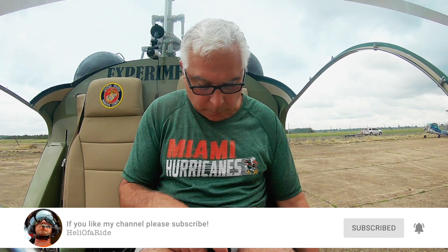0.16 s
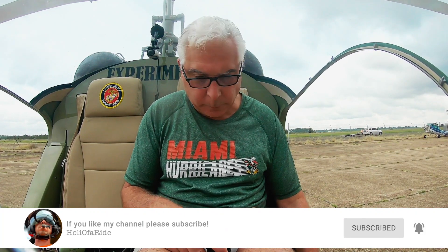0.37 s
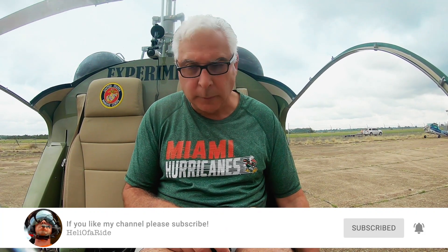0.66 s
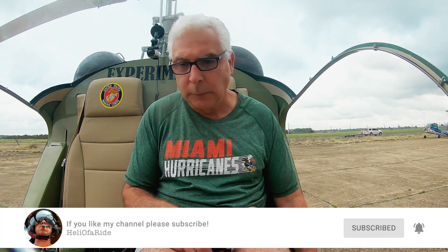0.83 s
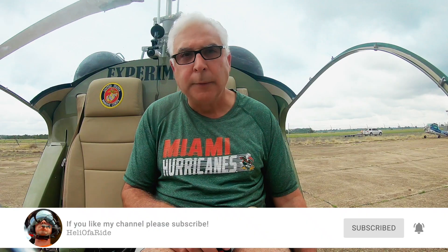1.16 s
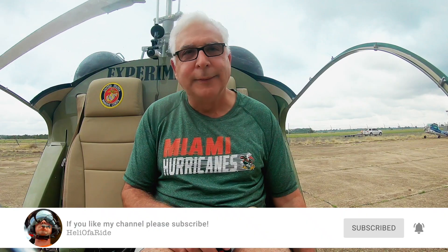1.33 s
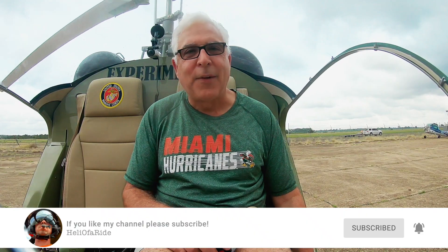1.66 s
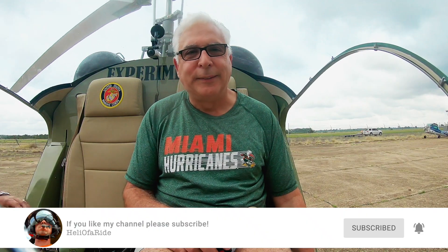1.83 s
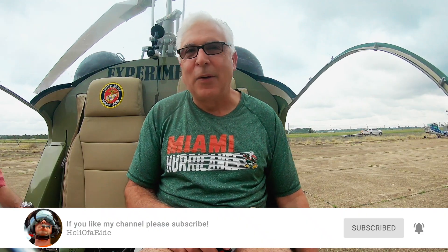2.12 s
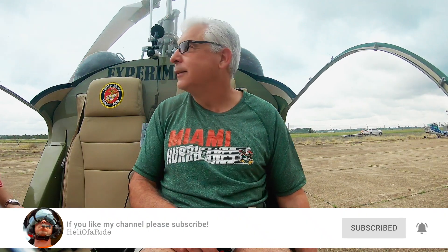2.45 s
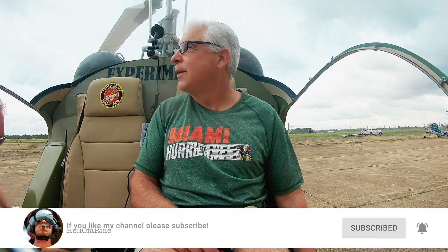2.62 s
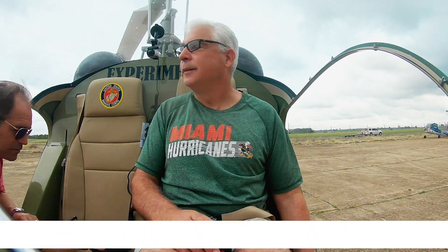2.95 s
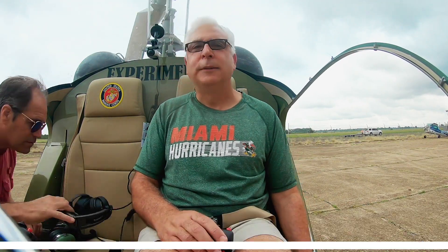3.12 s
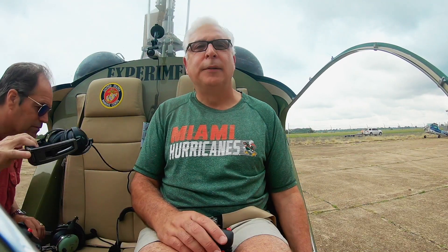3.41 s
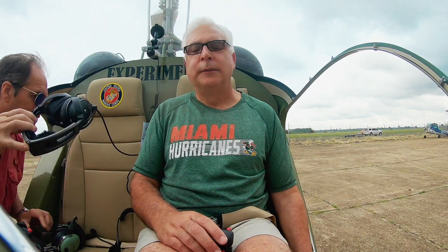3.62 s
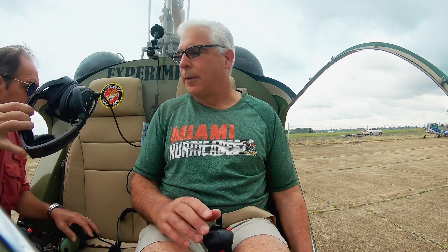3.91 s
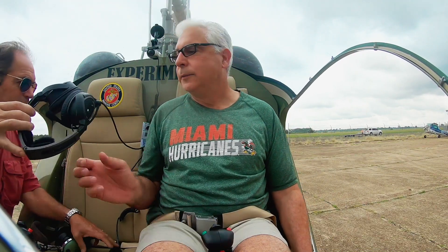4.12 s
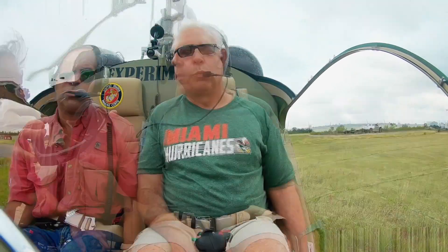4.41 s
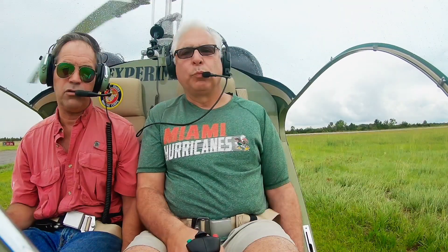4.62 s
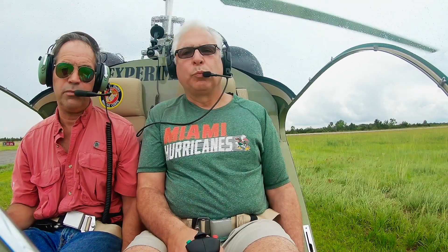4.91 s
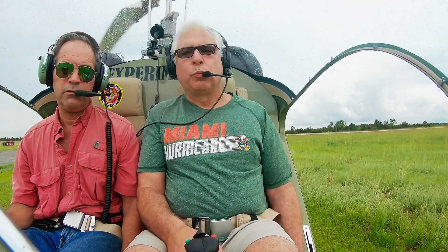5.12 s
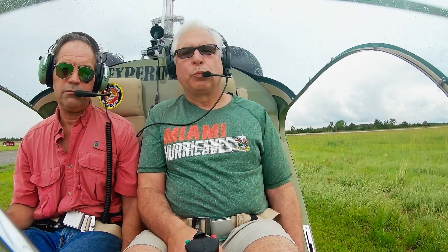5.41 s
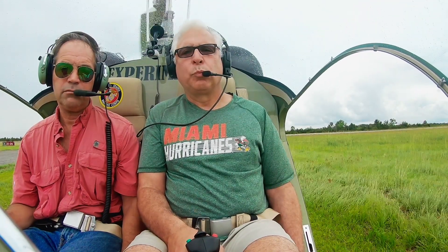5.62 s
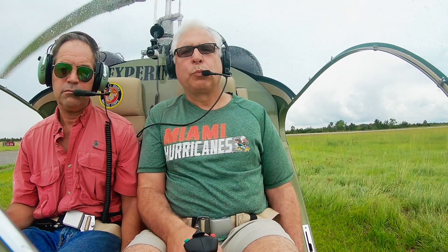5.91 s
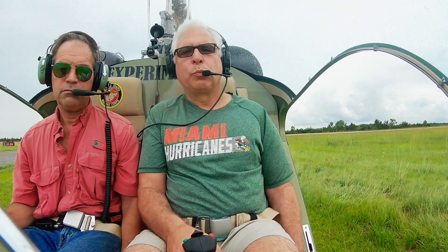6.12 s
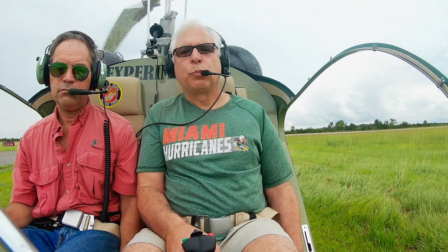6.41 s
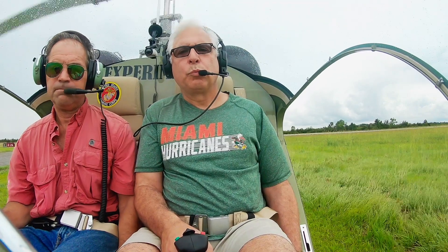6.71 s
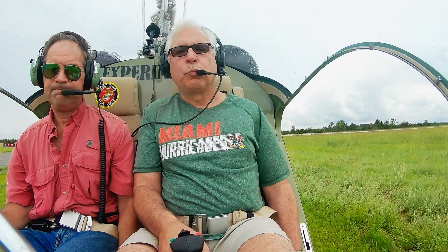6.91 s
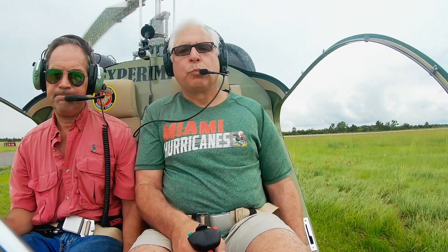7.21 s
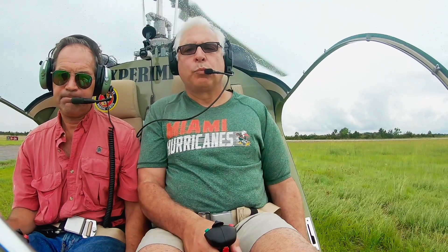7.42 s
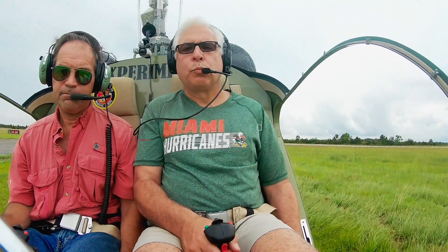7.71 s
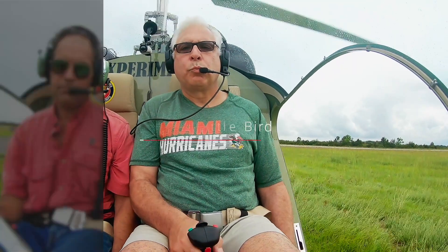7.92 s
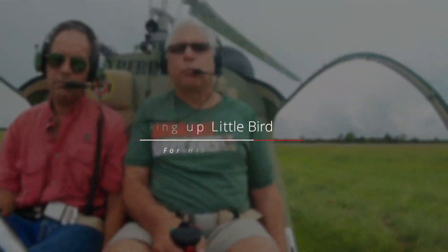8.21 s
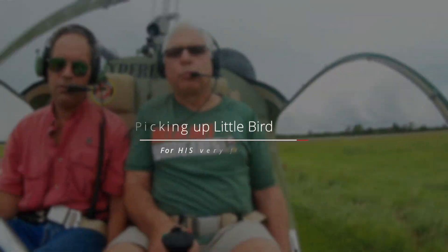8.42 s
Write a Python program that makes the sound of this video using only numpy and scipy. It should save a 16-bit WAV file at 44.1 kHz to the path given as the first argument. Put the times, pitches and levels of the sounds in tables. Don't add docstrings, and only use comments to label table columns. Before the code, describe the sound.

Muffled open-cockpit helicopter engine idling lumpily with soft knocks and air puffs, switching suddenly to a steady, droning, airier run under rising load.

```python
import sys
import numpy as np
from scipy import signal
from scipy.fft import rfft, irfft
from scipy.io import wavfile
from scipy.ndimage import uniform_filter1d

SR = 44100
rng = np.random.default_rng(int(sys.argv[2]) if len(sys.argv) > 2 else 0)


def unload_audio(sound):
    columns = np.transpose(np.atleast_2d(sound))
    steps = np.round(np.clip(columns, -1, 1) * 32767)
    wavfile.write(sys.argv[1], SR, steps.astype(np.int16))


def to_linear_factor(level_db):
    exponent = np.asarray(level_db, float) / 20
    return 10 ** exponent


N = 377055

# start_s, end_s
CROSSFADE = (4.395, 4.49)

# frequency_hz, density_db
IDLE_CHURN = [(15, -7), (50, -2.5), (95, -1.5), (140, -6.5), (185, -4), (222, -17), (270, -2.5),
              (330, -17.5), (400, -44), (600, -93)]
FAST_RUMBLE = [(15, -5), (40, 15), (90, 16), (130, 6), (190, 11.5), (250, 6.5), (320, 9), (400, -4.5),
               (470, -35), (700, -88.5)]
# centre_s, level_db, width_s
STUMBLES = [
    (.15, 1, .15),
    (1.6, 3.5, 0.088),
    (2.87, -2.5, 0.026),
    (3.32, 8.5, 0.16),
]

# frequency_hz, density_db
IDLE_AIR = [(250, -12), (330, -17.5), (590, -19.5), (700, -14), (1000, -13.5), (1250, -21.5), (1900, -29.5),
            (2600, -44), (3500, -53.5), (4600, -41.5), (5600, -38.5), (7200, -56.5), (10000, -65.5),
            (11000, -87.5), (15000, -100)]
FAST_AIR = [(300, -37), (400, -16.5), (600, -17.5), (1000, -17.5), (1200, -22.5), (1850, -28.5),
            (2600, -42), (3400, -51), (4800, -38), (5900, -42), (7200, -54.5), (9500, -62.5),
            (11500, -79.5), (15000, -74.5)]
# centre_s, level_db, width_s
SPITS = [
    (2.62, 4, .008),
    (2.645, 5.5, .016),
    (2.875, 3, .01),
    (3.47, 2, .012),
    (.81, 1.5, .014),
]

# frequency_hz, width_hz, level_db
IDLE_PANELS = [
    [(263.7, 60, 0), (185, 50, -5.5)],
    [(661.6, 33, -0.5), (709, 55, 0)],
    [(774.4, 45, 2), (823, 70, -7)],
    [(951, 55, 1), (1005, 70, -5.5), (1145, 76, -10.5)],
]
PANEL_DB = [-11, 0, 1, -6.5]
PANEL_BEATS = [
    [0, -3, 0, -8, -4, -8, -5, -8],
    [0, -6, 2, -3, -3, -4, -1, -6],
    [-3, 0, -2, -6, -3, -6, 3, -2],
    [-7, 0, -8, -8, -9, -9, 0, 2],
]
# frequency_hz, width_hz, level_db
FAST_COWL = [(666, 43, -1), (774, 65, -7), (790, 85, -2.5), (855, 61, -1.5), (955, 43, 1.5),
             (1050, 70, -12), (1264, 97, -10)]
FAST_BEATS = [0, -3, -9, -9, -1, -3, -8, -10]

# time_s, cycle_rate_hz
IDLE_SPEED = [(0, 8.532), (0.25, 8.13), (0.7, 7.89), (1.0, 8.205), (1.48, 7.97), (1.6, 9.102),
              (1.95, 8.097), (2.75, 8.244), (3.05, 8.271), (3.2, 8.766), (3.35, 8.15), (4.5, 8.219)]
# time_s, level_db
EFFORT = [(0, -5), (.25, 0), (.55, 0), (1.5, .5), (1.7, -1.5), (2.1, 0), (3.1, -0.5), (3.3, -5),
          (3.5, -0.5)]
# centre_s, level_db
MISFIRES = [(.196, -14), (.94, -7), (1.57, -2), (1.785, -3.5), (2.513, -2.5), (2.862, 6), (2.899, -13),
            (2.997, -6), (3.168, -10), (3.24, -12), (3.295, -2), (3.352, 0), (4.435, -4)]
# cycle_multiple, level_db
IDLE_ORDERS = [(4, -19), (6, -51.5), (8, -0.5), (12, -15.5), (16, -31.5), (24, -34.5)]

# time_s, shaft_rate_hz, fourth_order_db, load (0-1)
FAST_RUN = [
    (4.4, 22.24, -26, 0),
    (5.25, 22.31, -25.5, .05),
    (6.25, 22.45, -25.8, .5),
    (6.8, 22.49, -26.3, .8),
    (7.25, 22.52, -27, .85),
    (7.75, 22.62, -28.3, .95),
    (8.55, 22.8, -29.5, 1),
]
# shaft_multiple, light_load_db, heavy_load_db
STRONG_ORDERS = [(2, -15, -23), (3, -17, -12.5), (4, 0.5, 0), (5, -17, -17), (7, -37.5, -11.5), (8, -31, -13),
                 (9, -37, -10), (10, -25.5, -14.5), (11, -10.5, -5), (12, -17.5, -5.5), (13, -25.5, -16),
                 (14, -17, -16), (15, -22, -21),
                 (21, -26.5, -18.5), (22, -19.5, -29.5), (24, -22.5, -23.5), (25, -37.5, -19.5),
               (29, -23.5, -25), (30, -38, -22.5), (31, -43, -23), (33, -31, -32), (34, -23, -30.5),
               (35, -25.5, -25.5), (38, -24, -35.5), (40, -19.5, -27), (42, -29.5, -30.5), (43, -27, -32.5),
               (44, -19, -30.5), (45, -22, -20.5)]
# light_load_db, heavy_load_db
FAINT_ORDERS_DB = (-34, -31)


def evened(x):
    return x / np.sqrt(np.mean(x ** 2) + 1e-20)


def curves(rows):
    times, *values = np.transpose(rows)
    return [np.interp(np.arange(N) / SR, times, column) for column in values]


def drift(seconds, count, size):
    width = max(int(seconds * SR / 400), 1)
    noise = rng.standard_normal((count, N // 400 + 2))
    smooth = evened(uniform_filter1d(uniform_filter1d(noise, width), width))
    at = np.arange(0, N, size) / 400
    return np.array([np.interp(at, np.arange(len(row)), row) for row in smooth])


def bumps(rows, width_s=0):
    t = np.arange(0, N + 50, 50) / SR
    total = np.zeros(len(t))
    for row in rows:
        centre, db, width = (*row, width_s)[:3]
        total += db * np.exp(-((t - centre) / width) ** 2)
    return np.interp(np.arange(N) / SR, t, total)


def coloured(spectrum):
    hz = np.fft.rfftfreq(N, 1 / SR)
    f, db = np.transpose(spectrum)
    gain = to_linear_factor(np.interp(np.log(hz + 1), np.log(f + 1), db, right=-np.inf))
    return evened(irfft(rfft(rng.standard_normal(N)) * gain, N))


def air(spectrum, puffs_db, spits_db=0):
    x = coloured(spectrum)
    high = signal.sosfiltfilt(signal.butter(2, 3600, "high", fs=SR, output="sos"), x)
    top = signal.sosfiltfilt(signal.butter(2, 7000, "high", fs=SR, output="sos"), x)
    treble_db = puffs_db + spits_db
    return (x - high) * to_linear_factor(0.82 * puffs_db) + (high - top) * to_linear_factor(treble_db) + top * to_linear_factor(1.7 * treble_db)


def knocks(cycles, beats_db, modes, scatter_db, jitter_s, rough):
    beat = np.floor(8 * cycles).astype(int)
    at = np.flatnonzero(np.diff(beat)) + 1
    luck = rng.standard_normal((900, 2))[:len(at)]
    moment = np.clip(at + (jitter_s * SR * luck[:, 1]).astype(int), 0, N - 1)
    clicks = np.zeros(N)
    clicks[moment] = to_linear_factor(np.take(beats_db, beat[at] % 8) + scatter_db * luck[:, 0])
    rattle_decay = np.exp(-np.arange(900) / (0.005 * SR))
    rattle = signal.oaconvolve(clicks, rattle_decay)[:N] * rng.standard_normal(N)
    drive = (1 - rough) * evened(clicks) + rough * evened(rattle)
    t = np.arange(3000) / SR
    ring = np.zeros(len(t))
    for k, (hz, width_hz, db) in enumerate(modes):
        ring += (-1) ** k * to_linear_factor(db) * np.exp(-np.pi * width_hz * t) * np.sin(2 * np.pi * hz * t)
    soft_onset = 1 - np.exp(-t / 0.0022)
    return evened(signal.oaconvolve(drive, ring * soft_onset)[:N])


def orders(turns, multiples, db, spread, wobble_db, wobble_rad):
    k = np.reshape(multiples, (-1, 1))
    phase_drift = wobble_rad * k * drift(0.06, len(k), 8)
    angle = 2 * np.pi * (k * turns[::8] - spread * k ** 2 / 2) + phase_drift
    level_db = db + wobble_db * np.sqrt(k) * drift(0.11, len(k), 8)
    lines = to_linear_factor(level_db) * np.cos(angle)
    return np.sqrt(2) * signal.resample_poly(lines.sum(0), 8, 1, window=("kaiser", 14))[:N]


def idle():
    effort_db = curves(EFFORT)[0]
    cycles = np.cumsum(curves(IDLE_SPEED)[0]) / SR + 0.359
    once = np.cos(2 * np.pi * cycles)

    churn = to_linear_factor(-49 + bumps(STUMBLES)) * coloured(IDLE_CHURN)

    puffs_db = 2.3 * np.exp(2 * (once - 1)) + 0.67 * np.cos(4 * np.pi * cycles)
    puffs_db = puffs_db + 0.42 * drift(0.04, 1, 1)[0]
    rush = to_linear_factor(-48) * air(IDLE_AIR, puffs_db, bumps(SPITS))

    panels = np.zeros(N)
    for modes, level_db, beats_db in zip(IDLE_PANELS, PANEL_DB, PANEL_BEATS):
        panels += to_linear_factor(level_db) * knocks(cycles - 0.02, beats_db, modes, 1.2, jitter_s=0.0007, rough=0.45)
    cowl = to_linear_factor(-42.5 + 0.42 * effort_db) * evened(panels)

    shaft = cycles - 0.0075 * np.cos(2 * np.pi * (cycles - 0.35))
    weak_db = -3.5 * np.exp(1.5 * (once - 1))
    k, db = np.transpose(IDLE_ORDERS)
    boom = orders(shaft, k, db[:, None], spread=0.02, wobble_db=0.15, wobble_rad=0.015)
    boom = boom * to_linear_factor(-25 + effort_db + weak_db + bumps(MISFIRES, width_s=0.014))
    return boom + cowl + rush + churn


def fast_order_levels(load):
    thin_from, top_order = 47, 60
    table = {k: FAINT_ORDERS_DB for k in range(1, thin_from)}
    table |= {round(k): db for k, *db in STRONG_ORDERS}
    table |= {k: (-41, -41) for k in range(thin_from, top_order + 1)}
    table[3 / 2] = -18, -14.5
    light_db, heavy_db = np.transpose(list(table.values()))
    return np.array(list(table)), np.outer(light_db, 1 - load) + np.outer(heavy_db, load)


def fast():
    speed, boom_db, load = curves(FAST_RUN)
    turns = np.cumsum(speed) / SR + 0.3

    rumble = to_linear_factor(-39 + 3.8 * load) * coloured(FAST_RUMBLE)

    puffs_db = 0.5 * np.cos(2 * np.pi * 4 * turns) + 0.5 * drift(0.03, 1, 1)[0]
    rush = to_linear_factor(-41) * air(FAST_AIR, puffs_db)

    cowl = knocks(turns / 2, FAST_BEATS, FAST_COWL, 1.5, jitter_s=0.0002, rough=0.29)
    cowl = to_linear_factor(-48 + 2 * load) * cowl

    k, db = fast_order_levels(load[::8])
    spread = np.select([k < 7, k < 30], [0.42, 0.279], 0.0445)[:, None]
    boom = to_linear_factor(boom_db) * orders(turns, k, db, spread, wobble_db=0.18, wobble_rad=0.006)
    return boom + cowl + rush + rumble


def scene():
    share = np.interp(np.arange(N) / SR, CROSSFADE, (0, 1))
    return ((1 - share) * idle() + share * fast())[None]


def top_cut(x):
    return signal.sosfilt(signal.butter(12, 15000, fs=SR, output="sos"), x)


def record(dry):
    t = np.arange(N) / SR
    fade_in = np.clip((t + 0.0032) / 0.01, 0, 1)
    fade_out = np.clip((t[::-1] + 0.0067) / 0.0071, 0, 1)
    return top_cut(dry * fade_in * fade_out)


dry = scene()
out = record(dry)
unload_audio(out)
```